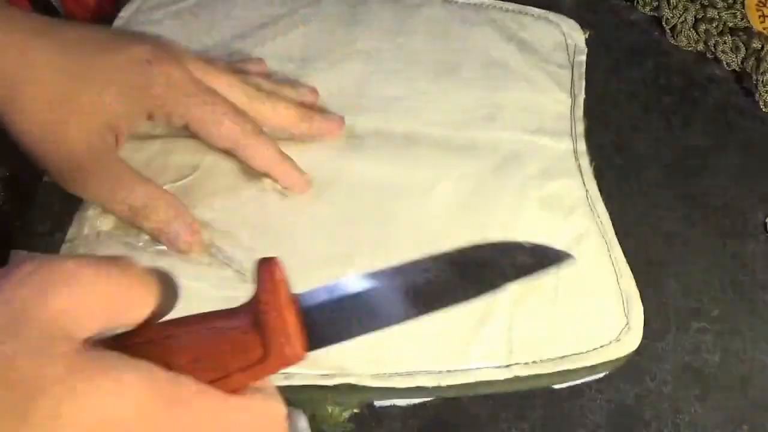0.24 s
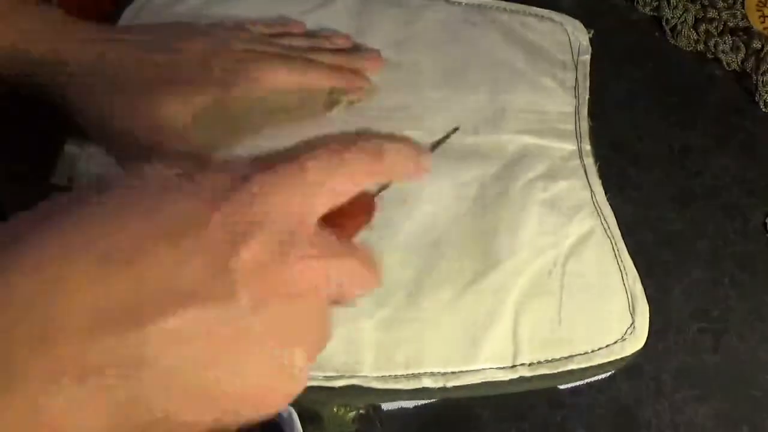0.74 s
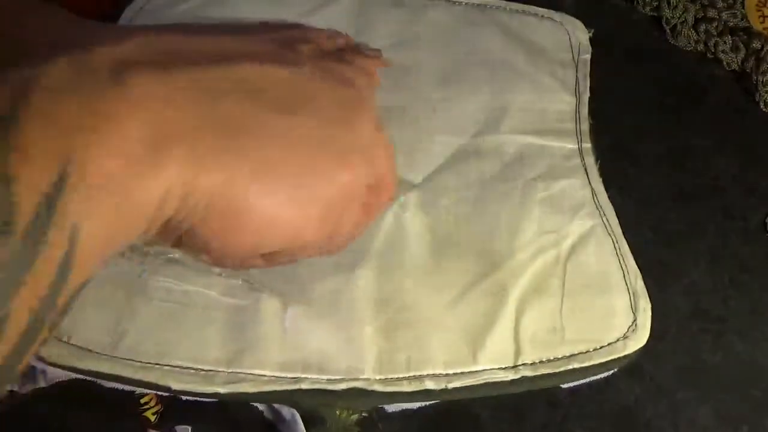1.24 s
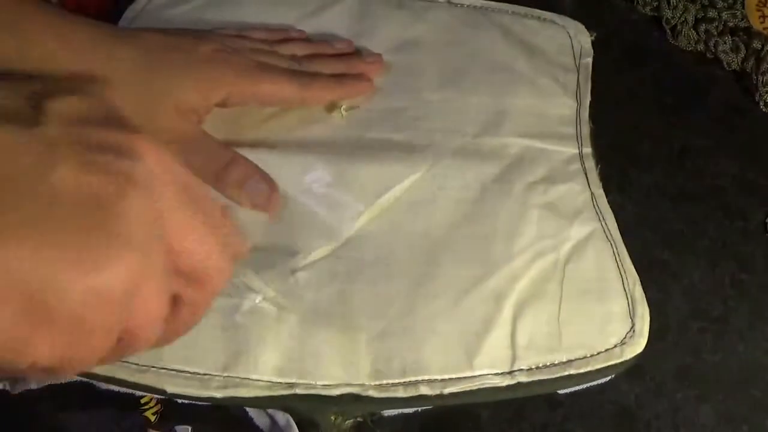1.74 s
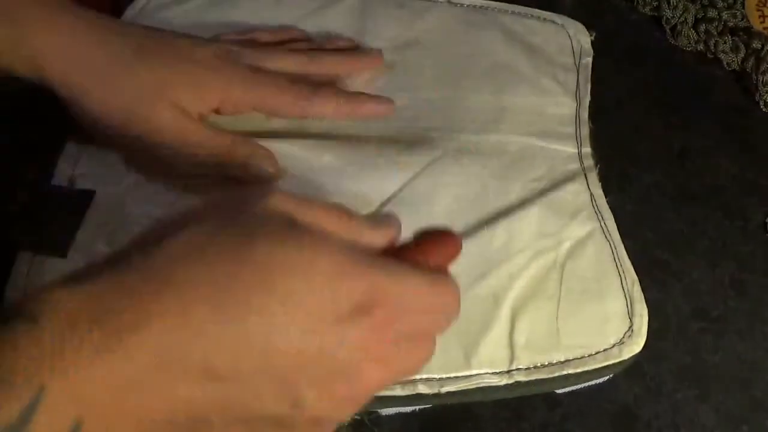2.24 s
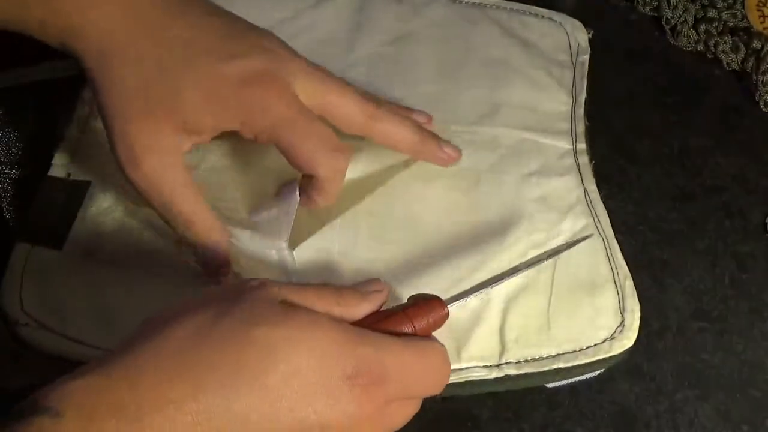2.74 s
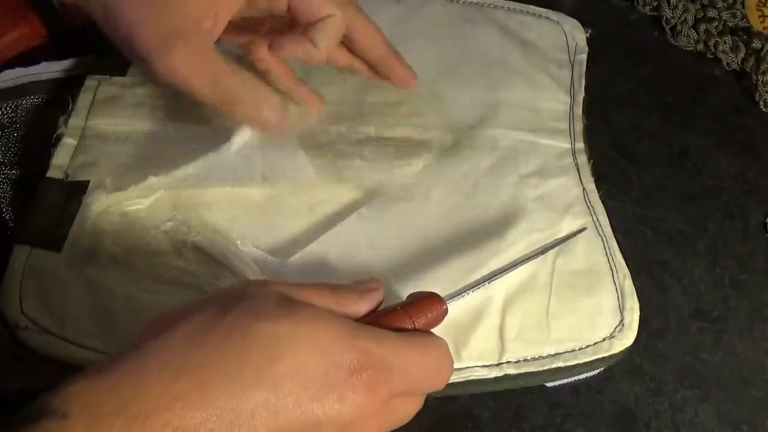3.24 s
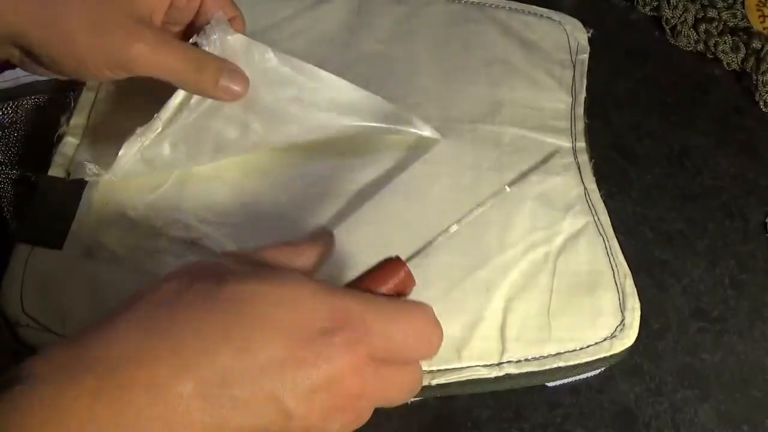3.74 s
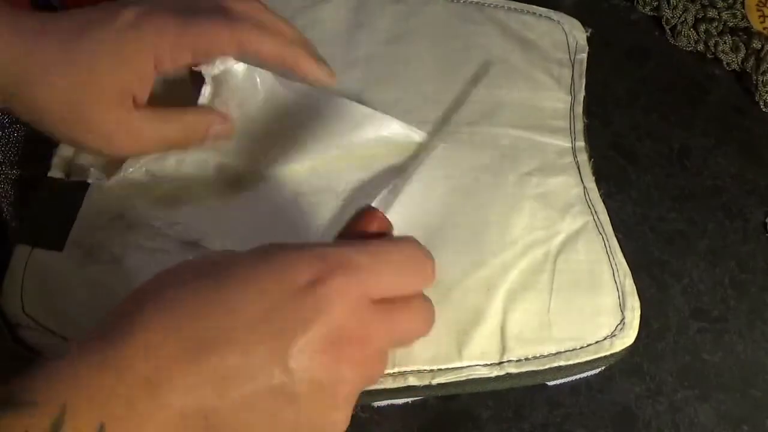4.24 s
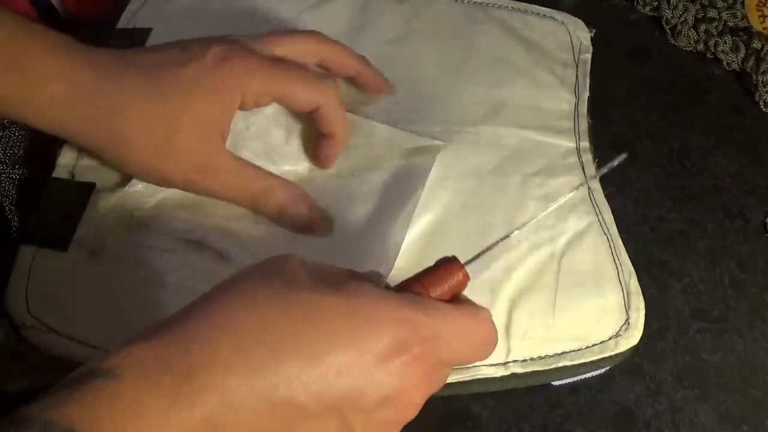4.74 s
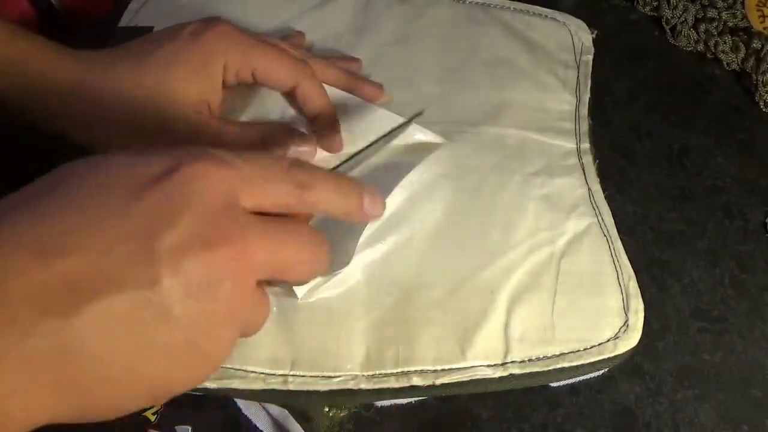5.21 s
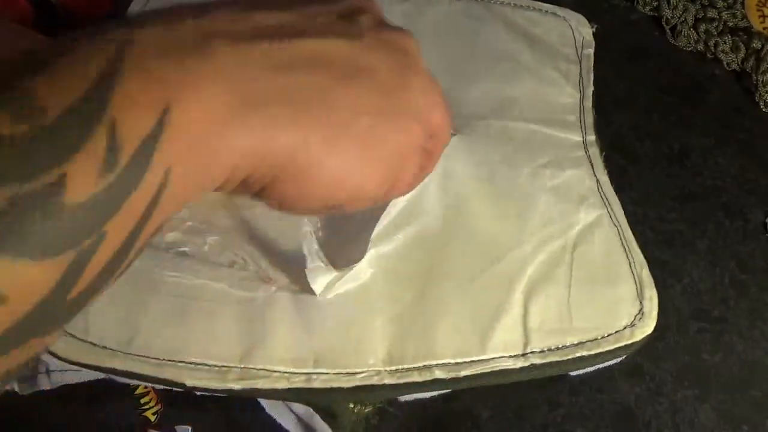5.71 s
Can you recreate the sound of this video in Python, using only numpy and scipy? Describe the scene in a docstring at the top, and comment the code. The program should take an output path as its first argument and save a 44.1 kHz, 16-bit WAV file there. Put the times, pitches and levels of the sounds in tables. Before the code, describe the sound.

A padded panel slides into place with a scrape and a soft bump. A knife point pops through its tough fabric cover and rasps across the weave. A hand peels the flap back, and stiff plastic layers rustle, tick and buckle with a few sharp pops. A second, louder rasping cut comes at the end. It is all heard close up in a quiet, dead room with a faint hum.

```python
"""Slitting a padded panel

A knife slits a tough fabric cover on a padded panel, close by in a quiet, dead room. The panel slides
into place, the point punches through, and the blade rasps across the weave twice by stick-slip friction.
Between the cuts a hand peels the flap back, and the stiff plastic layers under it rustle, tick and
buckle with sharp pops. Mains hum, room rumble and a faint electrical pip lie underneath."""
import sys
import numpy as np
from scipy import signal
from scipy.fft import rfft, irfft
from scipy.io import wavfile
from scipy.ndimage import uniform_filter1d

SR = 44100
rng = np.random.default_rng(int(sys.argv[2]) if len(sys.argv) > 2 else 0)


def wrap_up_sound(samples):
    """Save the sound to the file named by the first command line argument, as 16-bit audio."""
    columns = np.atleast_2d(samples).T
    # keep every value between -1 and 1, then stretch to whole-number steps
    tamed = np.clip(columns, -1, 1)
    steps = np.round(tamed * 32767).astype(np.int16)
    wavfile.write(sys.argv[1], SR, steps)


N = 263277
TIME = np.arange(N) / SR
SHORT = TIME[:SR // 4]  # time axis of one transient

# normal modes of the plastic sheet: pitch_hz, width_hz, level_db
SHEET_MODES = [(195, 23, -1.5), (331, 110, -6), (412, 170, -3), (790, 120, -7.5), (1200, 145, 4.5),
               (1390, 370, -16.5), (1925, 200, -5.5), (2475, 62, 7), (2930, 120, -30), (3530, 170, -15)]


def undb(db):
    """Decibels to amplitude ratio."""
    return 10 ** (np.asarray(db) / 20)


def unit(x):
    """Normalisation to an rms of one."""
    return x / np.sqrt(np.mean(x ** 2))


def butter(x, hz, kind, order=2):
    """Causal low-, high- or band-pass filtering."""
    return signal.sosfilt(signal.butter(order, hz, kind, fs=SR, output="sos"), x)


def colour(x, points):
    """Spectral shaping by an envelope through (frequency_hz, level_db) points."""
    hz, db = np.transpose(points)
    freqs = np.maximum(np.fft.rfftfreq(N, 1 / SR), 1)
    return irfft(rfft(x) * undb(np.interp(np.log(freqs), np.log(hz), db)), N)


def resonate(x, hz, width):
    """Forced response of one resonance, with unit gain at its centre."""
    return signal.lfilter(*signal.iirpeak(hz, hz / width, fs=SR), x)


def wander(rate_hz):
    """Smooth random modulation with an rms of one."""
    step = max(int(SR / rate_hz), 2)
    held = np.repeat(rng.standard_normal(N // step + 1), step)
    return unit(uniform_filter1d(held, step)[:N])


def registers(x, splits_hz=(520, 3500)):
    """Crossover into low, middle and high parts, each with unit power in the core of its band."""
    # core of each register: low_hz, high_hz
    cores = [(90, 450), (600, 3200), (4500, 11000)]
    parts = (butter(x, splits_hz[0], "low", order=4), butter(x, splits_hz, "band", order=4),
             butter(x, splits_hz[1], "high", order=4))
    return [part / np.std(butter(part, core, "band", order=4)) for part, core in zip(parts, cores)]


def add(track, start_s, sound):
    """Superposition of a sound on a track."""
    i = max(int(start_s * SR), 0)
    track[i:i + len(sound)] += sound[:N - i]


def fibre_slips(per_s, spread_db):
    """Shot noise: a random train of tiny slips of uneven size."""
    slipping = rng.random(N) < per_s / SR
    return unit(slipping * rng.standard_normal(N) * undb(spread_db * rng.standard_normal(N)))


def flexing(x, depth_db, rate_hz):
    """Modal modulation: as the sheet bends, its resonances come and go."""
    return x + sum(resonate(x, hz, width) * (undb(depth_db * wander(rate_hz)) - 1)
                   for hz, width, _ in SHEET_MODES)


def layer_gains(effort_db, padding_db, sheet_db, fibre_db, firm_db=-44):
    """Power laws of friction: the padding gains least with effort, so a harder rub is brighter."""
    over_db = effort_db - firm_db
    layers_db = np.array([padding_db + 0.83 * over_db, sheet_db + 0.99 * over_db, fibre_db + over_db])
    return undb(firm_db + layers_db)


def dragging(lift_s=0.01):
    """Sliding friction: the three layer gains follow the effort of panel or blade while in contact."""
    # effort of each drag, as the level of its rasp: time_s, level_db
    slide = [(0.0, -34.5), (0.082, -43), (0.13, -39.5)]
    first_cut = [(1.0, -63), (1.05, -54.5), (1.252, -41.5), (1.388, -41), (1.442, -49.5), (1.568, -52),
                 (1.66, -52), (1.67, -54)]
    first_cut_end = [(1.73, -55), (1.824, -52), (1.95, -67.5), (1.96, -80)]
    second_cut = [(5.5, -62.5), (5.564, -56), (5.594, -56.5), (5.65, -44.5), (5.726, -42), (5.814, -45),
                  (5.924, -35), (5.97, -36.5)]

    def drag(effort, padding_db, sheet_db):
        """Coupling to the layers below, at levels relative to a firm rasp."""
        time_s, level_db = np.transpose(effort)
        contact = np.clip(1 + np.minimum(TIME - time_s[0], time_s[-1] - TIME) / lift_s, 0, 1)
        return contact * layer_gains(np.interp(TIME, time_s, level_db), padding_db, sheet_db, 0)

    return (drag(slide, -24, -9) + drag(first_cut, -15, -9)
            + drag(first_cut_end, -17.5, -8.5) + drag(second_cut, -14, -4))


def handling(drop_db=9.5, roundness=1.46):
    """Incoherent addition: the hand's swells of rustle sum in power to give the three layer gains."""
    # moves of the hand on the plastic: peak_s, rise_s, fall_s, level_db, brightness_db
    swells = [(0.153, 0.026, 0.044, -44.5, 5), (.505, 0.018, 0.013, -76, 14.5),
              (.58, 0.015, 0.048, -54, -3), (.92, 0.039, 0.075, -66.5, 1), (2.14, 0.022, .035, -67.5, 8.5),
              (2.256, 0.061, 0.058, -49.5, 1.5), (2.5, 0.078, 0.073, -61.5, 5),
              (2.825, 0.075, 0.019, -61, 8), (2.95, 0.039, 0.034, -49, 1), (3.071, 0.04, 0.03, -53, 5),
              (3.18, .015, 0.033, -71, 12.5), (3.26, 0.053, .03, -72, 13), (3.41, 0.041, 0.03, -60, 9.5),
              (3.535, 0.046, 0.12, -62, 8.5), (3.98, 0.21, 0.24, -60, 3.5), (4.15, 0.042, 0.07, -52, 5.5),
              (4.29, 0.059, 0.066, -46.5, 2), (4.385, .04, 0.076, -57, 0.5), (4.55, 0.057, 0.023, -54.5, 4),
              (4.68, 0.098, 0.1, -51, 6), (4.79, 0.066, 0.088, -51.5, 5), (4.99, 0.07, 0.037, -63, 5),
              (5.12, 0.054, 0.032, -52, 3), (5.298, 0.0057, .015, -71.5, 16.5)]
    resting_db = (-70, -76, -67.5)  # padding, sheet, fibres
    t = np.linspace(0, TIME[-1], N // 100)
    power = undb(resting_db)[:, None] ** 2
    for peak_s, rise_s, fall_s, level_db, brightness_db in swells:
        from_peak = np.maximum((peak_s - t) / rise_s, (t - peak_s) / fall_s)
        effort_db = level_db - drop_db * np.abs(from_peak) ** roundness
        power = power + layer_gains(effort_db, padding_db=-10, sheet_db=0, fibre_db=brightness_db) ** 2
    return [np.interp(TIME, t, np.sqrt(layer)) for layer in power]


def rubbing():
    """Stick-slip friction under blade and fingers: the weave rasps finely, the plastic rustles."""
    # spectra of the weave's rasp and the plastic's rustle: frequency_hz, level_db
    weave_spectrum = [(30, -18), (60, 9), (120, -12.5), (190, 8), (300, -2.5), (550, -5.5), (900, -7),
                      (1400, -10.5), (1700, -6.5), (2000, -6.5), (2300, -8.5), (4000, -11), (6000, -5.5),
                      (9600, 0.5), (11000, -2)]
    rustle_spectrum = [(60, -4), (150, -4.5), (430, -5), (800, -1.5), (1200, 2), (1700, 0.5), (2500, -2),
                       (3500, -6), (7000, -5.5), (9700, -3), (11000, -4.5)]
    # modes of the taut cover singing under the edge: pitch_hz, width_hz, level_db
    singing_modes = [(1640, 140, -3), (2044, 130, -2)]
    threads = 0.21 * np.clip(fibre_slips(per_s=200, spread_db=3.5), -38, 38)  # whole threads give way
    slips = colour(fibre_slips(per_s=16000, spread_db=1.5) + threads, weave_spectrum)
    singing = sum(undb(db + 3.6 * wander(30)) * resonate(slips, hz, width)
                  for hz, width, db in singing_modes)
    weave = registers(flexing(slips + singing, depth_db=2.0, rate_hz=50))
    plastic_slips = colour(fibre_slips(per_s=7000, spread_db=0.5), rustle_spectrum)
    sheet = registers(flexing(plastic_slips, depth_db=3.0, rate_hz=30))
    grip_db = 0.8 * wander(70) + 0.37 * wander(350)  # the contact catches and lets go
    out = 0
    for drag, hand, rasp, rustle, flicker_db in zip(dragging(), handling(), weave, sheet, (1.6, 1.1, .7)):
        out = out + undb(grip_db + flicker_db * wander(140)) * (drag * rasp + hand * rustle)
    return out


def room_tone(noise_db=-62.5, hum_hz=98.3, hum_db=-71.5):
    """Noise floor: hum near twice the mains frequency, hiss, and rumble coherent on both sides."""
    # spectrum of the room's noise: frequency_hz, level_db
    room_spectrum = [(20, -28), (35, -1), (54, 8.5), (76, -10), (130, -7.5), (200, -7), (400, -12),
                     (1000, -13), (2000, -16), (3000, -17.5), (6000, -24), (11000, -25)]
    mid, side = (unit(colour(rng.standard_normal(N), room_spectrum)) for _ in range(2))
    hum_gain = undb(hum_db + 3.3 * wander(5.23))
    hum = hum_gain * unit(np.sin(2 * np.pi * hum_hz * TIME + 0.18 * wander(6.8)))
    spread = 1.06 * butter(side, 330, "high", order=1) * np.array([[1], [-1]])
    return hum + undb(noise_db) * (mid + spread)


def electrical_pips(pitch_hz=2455, level_db=-60.5, half_width_s=0.0026, period_s=.04, first_s=.01):
    """Periodic tone bursts: electronics give off a faint pip under a bell-shaped envelope."""
    offset_s = (TIME - first_s + period_s / 2) % period_s - period_s / 2
    envelope = undb(level_db) * np.exp(-(offset_s / half_width_s) ** 2)
    return envelope * np.sin(2 * np.pi * pitch_hz * offset_s + wander(25))


def crumple(length_ms, shiver_db, shiver_s):
    """Broadband excitation: a run of micro-snaps swells and dies, and the layers shiver on."""
    age = SHORT * 1000 / length_ms
    run = (age + 0.029) * np.exp(-4 * age)
    shiver = np.exp(-SHORT / shiver_s)
    envelope = run / np.linalg.norm(run) + undb(shiver_db) * shiver / np.linalg.norm(shiver)
    spectrum = rfft(rng.standard_normal(len(SHORT)) * envelope)
    # the force has an even spectrum: all the colour comes from what it shakes
    force = irfft(spectrum / np.sqrt(uniform_filter1d(np.abs(spectrum) ** 2, size=60)), len(SHORT))
    return force * (SHORT < SHORT[-1] / 2)


def stray_snaps(count=14, span_s=(.25, 3.7), level_db=-60.5, spread_db=3, length_ms=1.2, pitch_hz=8800):
    """A random point process: rows of fainter snaps while the cover is worked."""
    times = rng.uniform(*span_s, count)
    levels = level_db + spread_db * rng.uniform(-1, 1, count)
    return [(start_s, db, db - 6, length_ms, pitch_hz) for start_s, db in zip(times, levels)]


def thread_ticks(averaging_s=.01):
    """Sudden release of tension: a thread or crease snaps with a click and stirs its neighbours."""
    # snapping threads and small creases: start_s, click_db, body_db, length_ms, pitch_hz
    snaps = [(0.1411, -29, -42, 0.93, 10200), (0.3075, -62, -69, 1.5, 6400),
             (0.3882, -57.5, -61, 0.73, 7700), (1.6943, -52, -68, 0.65, 8700), (1.712, -55, -68, .7, 9200),
             (1.719, -45.5, -62, .7, 9700), (2.17, -49.5, -52.5, .7, 9800), (2.1925, -41, -47, 0.85, 9400),
             (2.3418, -55, -64, 1.2, 8900), (2.3641, -45, -54, 0.65, 8900), (2.409, -65, -57, 2.8, 6800),
             (2.925, -38, -43, 6.3, 10400), (3.19, -58.5, -59, 0.67, 6700),
             (3.338, -53.5, -56.5, 7.6, 9000), (3.3727, -50, -57, 4.1, 9700), (3.394, -40.5, -51, 10, 9400),
             (3.4444, -47, -49, .64, 8000), (3.5425, -58, -64, 1.3, 6200), (3.61, -53, -59, 1.3, 8200),
             (3.6448, -47, -52.5, 1.05, 5370), (3.6851, -42.5, -56, 1.1, 7200),
             (4.463, -54, -55, 2.8, 7200)]
    out = np.zeros(N)
    for start_s, click_db, body_db, length_ms, pitch_hz in list(snaps) + stray_snaps():
        force = crumple(length_ms, shiver_db=-7.5, shiver_s=0.006)
        force[0] += 0.51 / length_ms ** 2  # a lone thread parts all at once
        click = registers(resonate(butter(force, pitch_hz / 2, "high"), pitch_hz, width=4400))[2]
        body = registers(resonate(force, hz=1700, width=5500))[1]
        tick = undb(click_db) * click + undb(body_db) * body
        add(out, start_s, tick * np.sqrt(averaging_s / SHORT[-1]))
    return out


def ring(modes):
    """Free vibration: each mode is a damped sinusoid whose bandwidth sets its decay."""
    return sum(undb(db) * np.exp(-np.pi * width * SHORT) * np.sin(2 * np.pi * hz * SHORT)
               for hz, width, db in modes)


def panel_bumps():
    """Impact excitation: soft bumps ring the padded panel, and a longer contact sounds duller."""
    # bumps on the panel: start_s, level_db, contact_ms
    bumps = [(0.157, -24, 2.6), (0.2, -40, 3), (0.627, -38, 8.9), (0.881, -33.5, 1.5), (1.35, -46.5, 0.88),
             (2.937, -37, 1.1), (2.982, -30, 2.4), (3.062, -34, 2), (3.35, -37, 11), (3.685, -49, 1.2)]
    # modes of the panel: pitch_hz, width_hz, level_db
    panel_modes = [(61, 4.5, -20), (99, 16, -12.5), (184.5, 12, -10), (201, 23.5, -3.5)]
    out = np.zeros(N)
    for start_s, level_db, contact_ms in bumps:
        force = np.hanning(int(contact_ms * SR / 1000) + 3)
        add(out, start_s, undb(level_db) * np.convolve(ring(panel_modes), force / force.sum()))
    return out


def buckling_pops(shiver_s=0.012, patch_width_hz=170, patch_db=2.5, padding_db=-10, averaging_s=.025):
    """Snap-through buckling: a patch flips over, rings at its own pitch and shakes the whole sheet."""
    # buckling patches of plastic: start_s, level_db, brightness_db, length_ms, pitch_hz
    buckles = [(0.556, -54.5, -0.5, 14, 790), (0.5672, -53, -1.5, 7.5, 1090), (1.35, -50.5, -6, 4.3, 750),
               (2.834, -54, 4, 4, 1920), (2.937, -37.5, -4.5, 2, 860), (2.981, -25, -7, 6, 2260),
               (3.023, -48.5, 1, 9, 2000), (3.063, -51, 6.5, 16, 700), (3.431, -57, 7, 15, 3450),
               (4.1068, -44, -2, 0.58, 1230), (4.115, -33.5, -5.5, 1.2, 1550),
               (4.1675, -46, -16, 1.4, 1390), (4.294, -46, -2.5, 11, 1500), (4.667, -46, -3, 7.3, 796),
               (4.837, -49, -4.5, 3.4, 1180), (5.1445, -43.5, -9, 1.1, 1350),
               (5.3086, -43, -13.5, 1.9, 2300), (5.4078, -43.5, -9.5, 1.1, 1340)]
    out = np.zeros(N)
    for start_s, level_db, brightness_db, length_ms, pitch_hz in buckles:
        force = crumple(length_ms, shiver_db=-6, shiver_s=shiver_s)
        force[0] += 0.81 / length_ms  # a clean flip is nearly a single snap
        creases = crumple(length_ms + 1.5, shiver_db=10, shiver_s=shiver_s)  # these crackle for longer
        hiss = registers(butter(creases, 3000, "high"))[2]
        modes = list(SHEET_MODES) + [(pitch_hz, patch_width_hz, patch_db)]
        ringing = sum(undb(db) * resonate(force, hz, width) for hz, width, db in modes)
        crack = 0.43 * butter(force, 48, "high")
        low, middle, _ = registers(crack + ringing)
        pop = undb(padding_db) * low + middle + undb(brightness_db) * hiss
        add(out, start_s, undb(level_db) * pop * np.sqrt(averaging_s / SHORT[-1]))
    return out


def knife_stab(start_s=.8795, level_db=-19.5):
    """Membrane vibration: the point pops the cover like a drum as threads part around it."""
    # modes of the cover: pitch_hz, width_hz, level_db
    cover_modes = [(565, 160, -25), (740, 78, 1.5), (945, 230, 3.5), (1500, 170, -4), (1670, 140, -4)]
    drum = butter(butter(ring(cover_modes), 1830, "low", order=6), 490, "high")
    parting = undb(-18.0) * rng.standard_normal(len(SHORT)) * np.exp(-SHORT / 0.0069)
    out = np.zeros(N)
    add(out, start_s, undb(level_db) * (parting - drum / np.abs(drum).max()))
    return out


def reflections(x, echo_s=.007, echo_db=-16, tail_db=-11.0, side_db=-12, t60_s=0.088, paths=6):
    """Reflection: a near surface returns one echo; the short reverberation shifts as hands and flap move."""
    decay = np.exp(-np.log(1000) * SHORT / t60_s) * np.clip(SHORT / 0.0029, 0, 1)
    shares = np.array([wander(14) for _ in range(paths)])
    shares /= np.linalg.norm(shares, axis=0)  # constant total power
    scattered = butter(x, 226, "high")
    mid, side = np.zeros((2, N))
    for tail in (mid, side):
        for share in shares:
            response = rng.standard_normal(len(decay)) * decay / np.linalg.norm(decay)
            tail += signal.fftconvolve(scattered * share, response)[:N]
    echo = np.pad(scattered, (int(echo_s * SR), 0))[:N]
    return x + undb(echo_db) * echo + undb(tail_db) * mid + undb(side_db) * side * np.array([[1], [-1]])


def scene():
    """Superposition: the cutting and handling, their reflections and the background."""
    direct = rubbing() + buckling_pops() + thread_ticks() + panel_bumps() + knife_stab()
    return reflections(direct) + room_tone() + electrical_pips()


def record(dry, bottom_hz=39, top_hz=11000):
    """Band limiting: the deepest bass is thinned and the top is cut steeply."""
    low_pass = signal.ellip(12, .2, 75, top_hz, fs=SR, output="sos")
    return signal.sosfilt(low_pass, butter(dry, bottom_hz, "high"))


dry = scene()
out = record(dry)
wrap_up_sound(out)
```